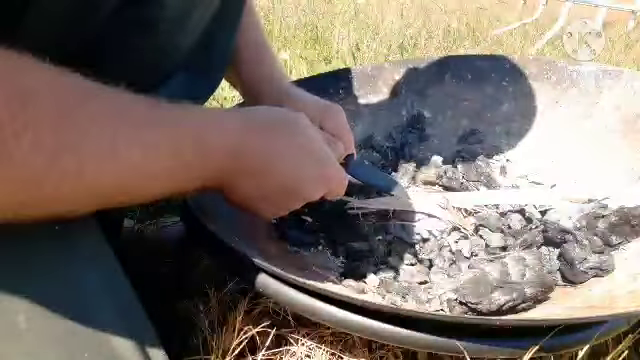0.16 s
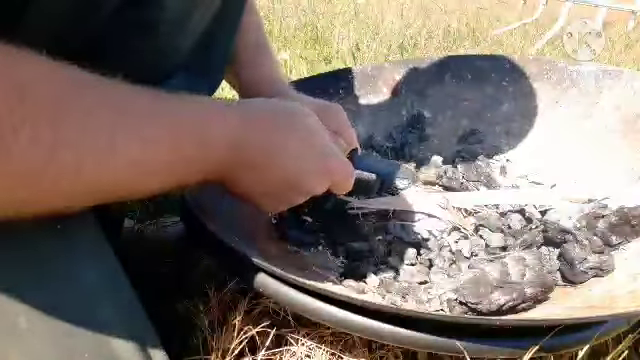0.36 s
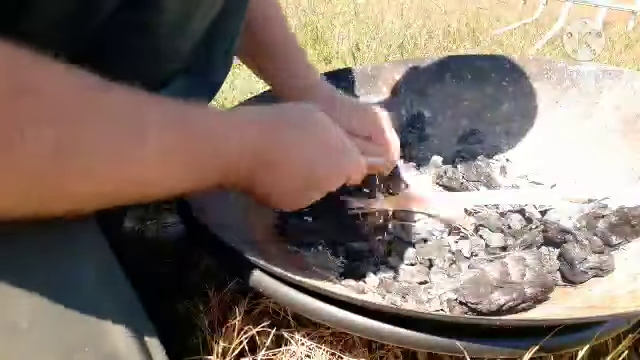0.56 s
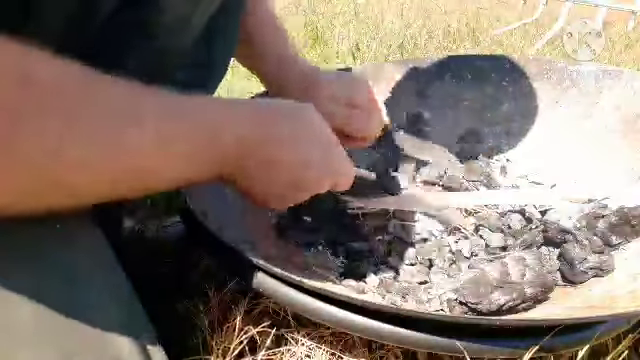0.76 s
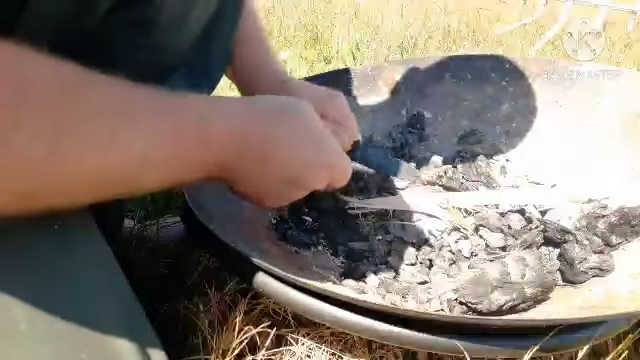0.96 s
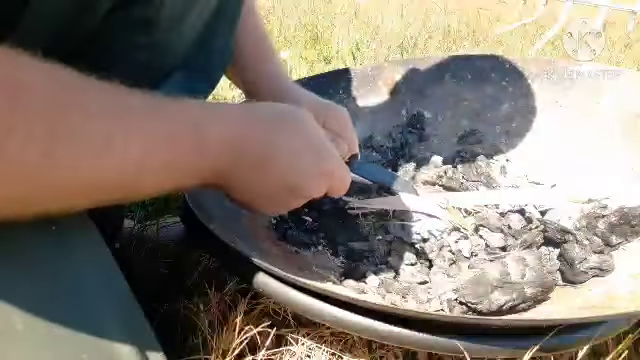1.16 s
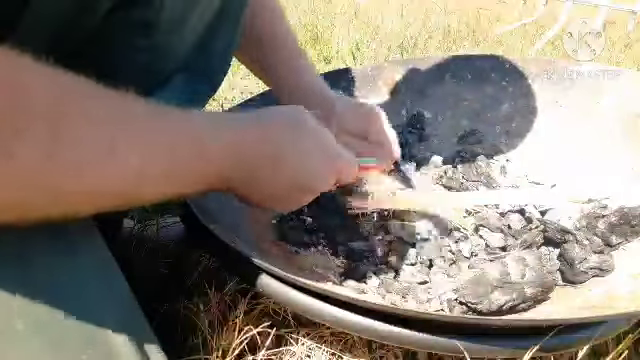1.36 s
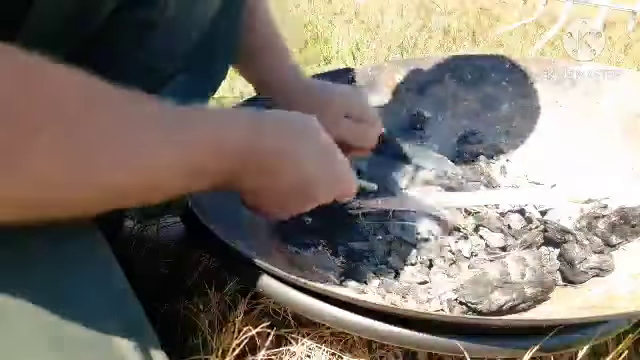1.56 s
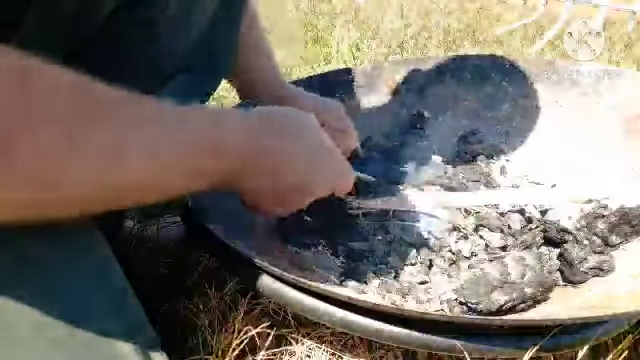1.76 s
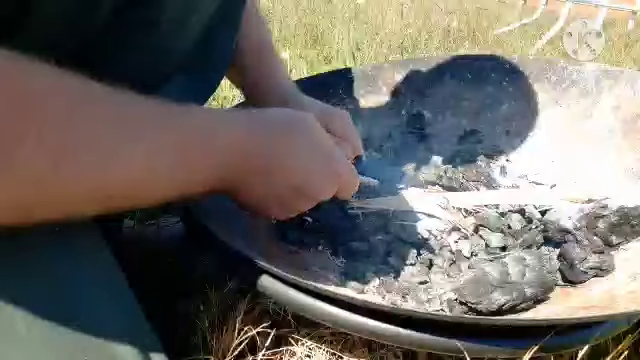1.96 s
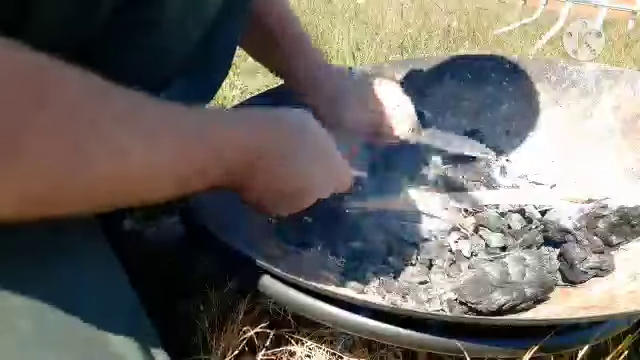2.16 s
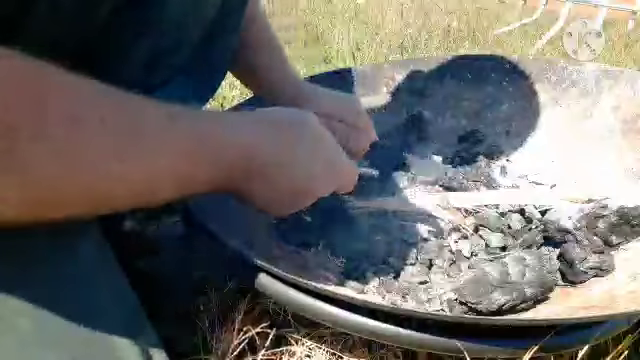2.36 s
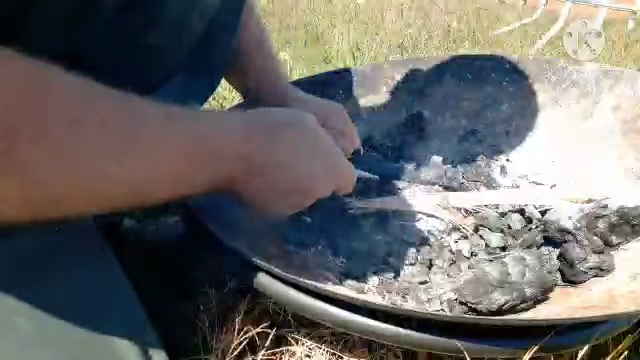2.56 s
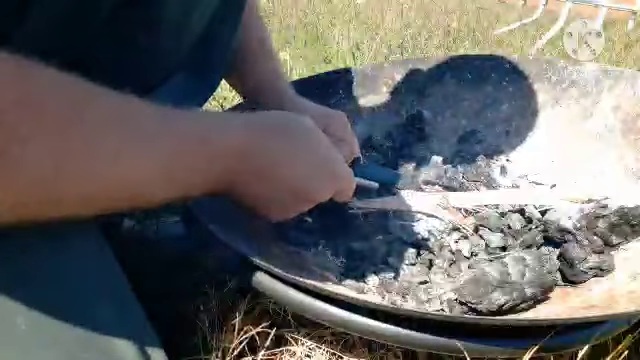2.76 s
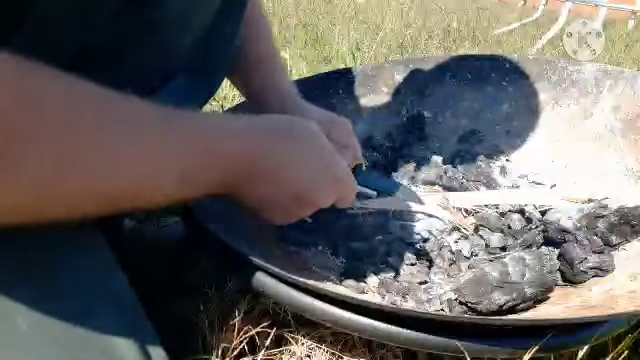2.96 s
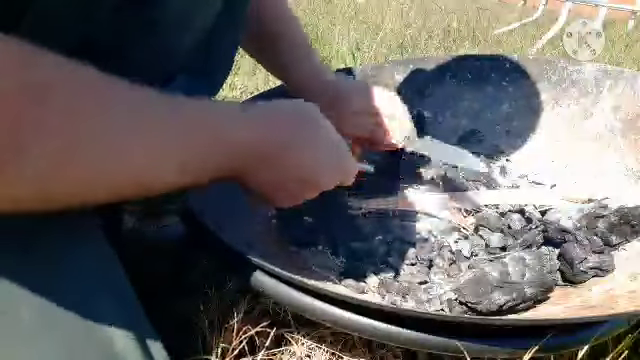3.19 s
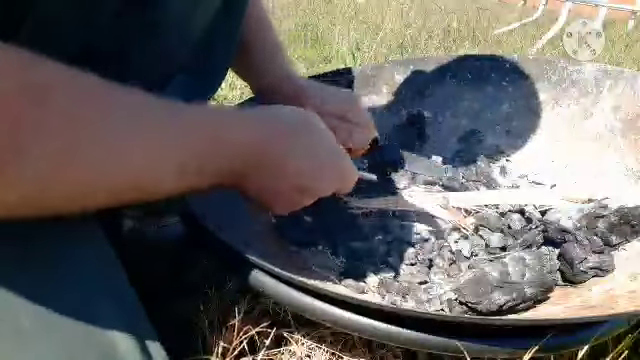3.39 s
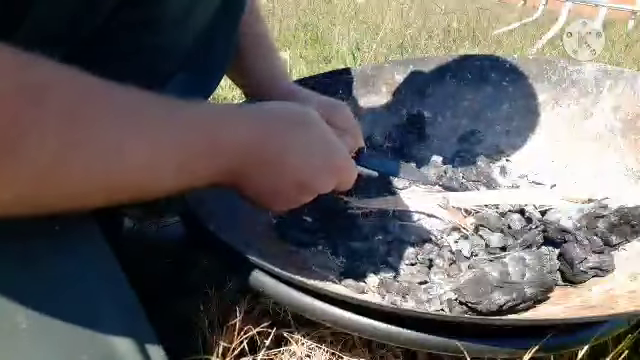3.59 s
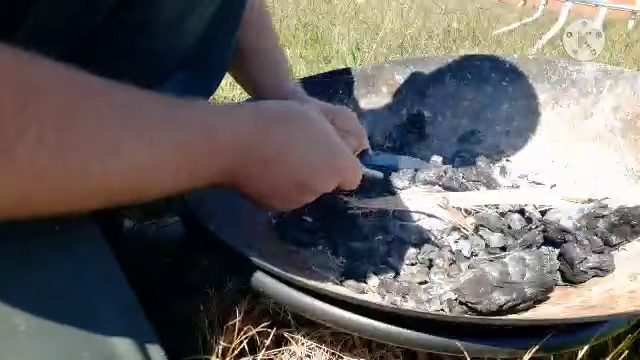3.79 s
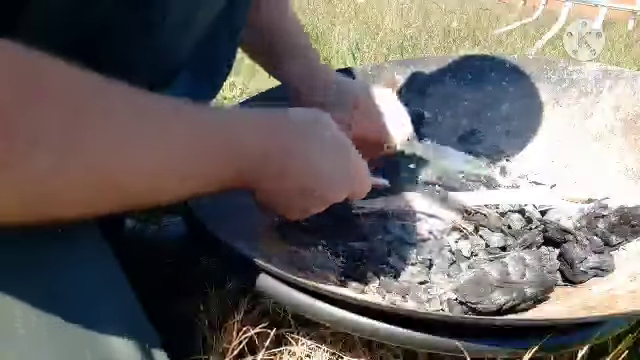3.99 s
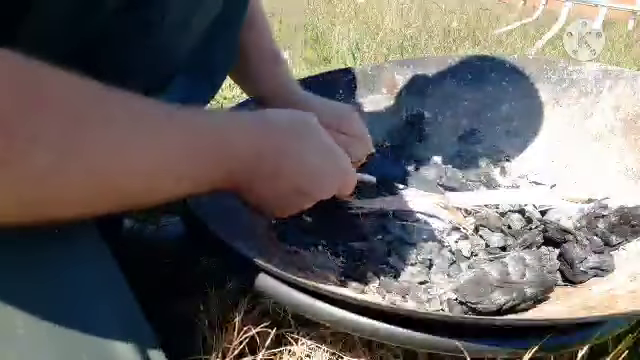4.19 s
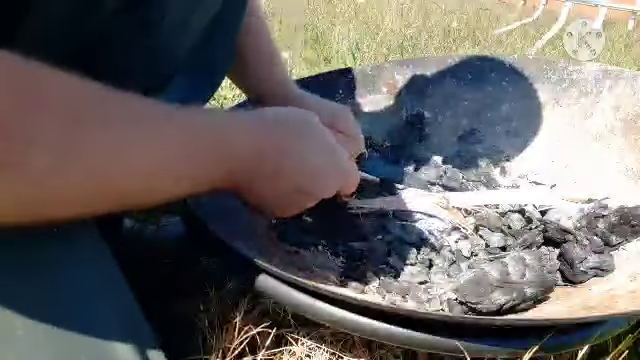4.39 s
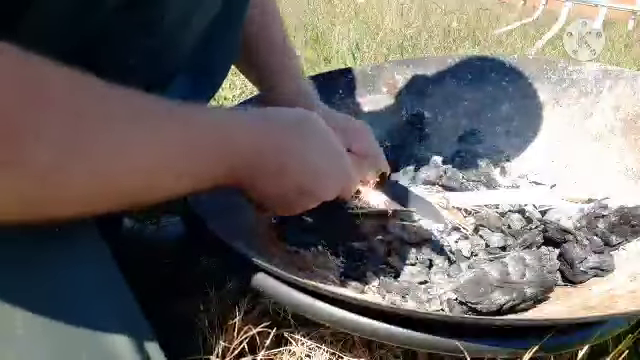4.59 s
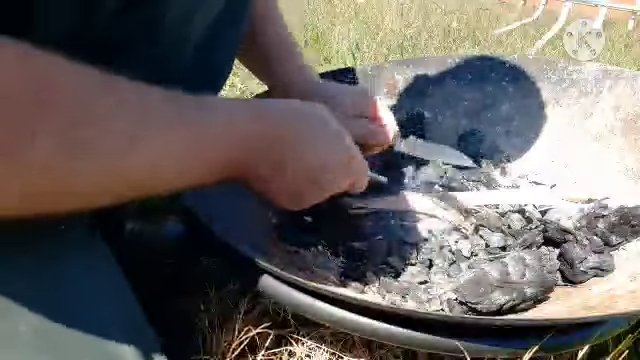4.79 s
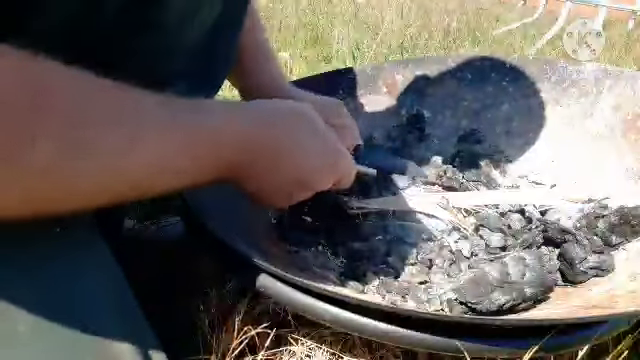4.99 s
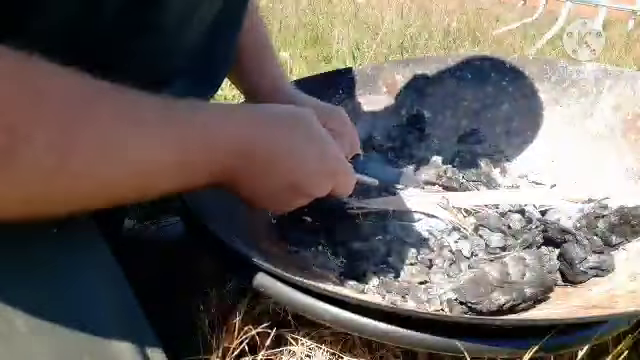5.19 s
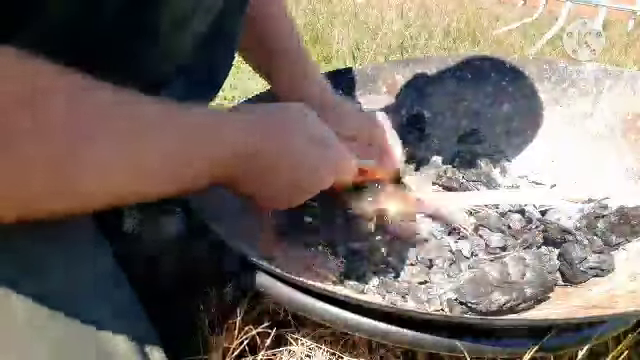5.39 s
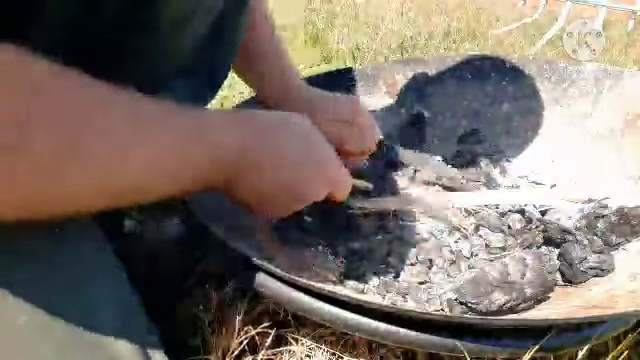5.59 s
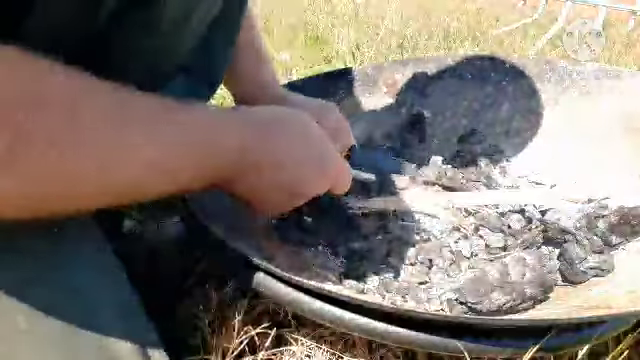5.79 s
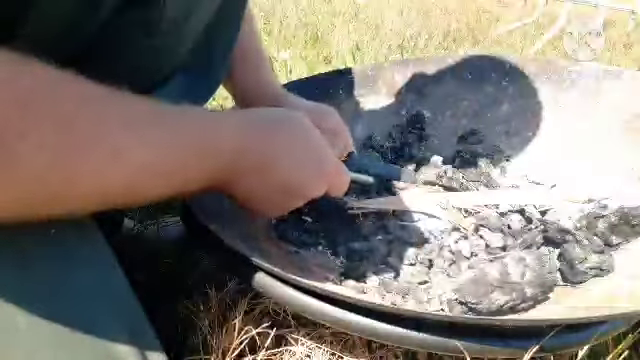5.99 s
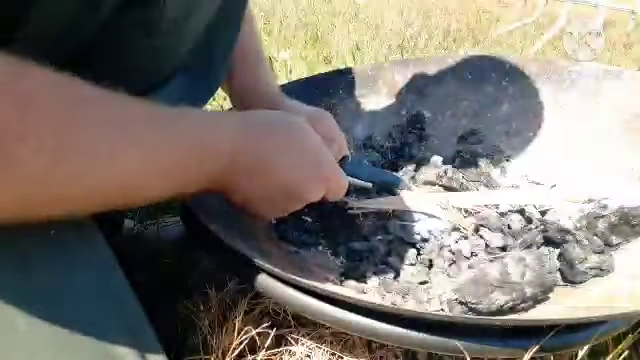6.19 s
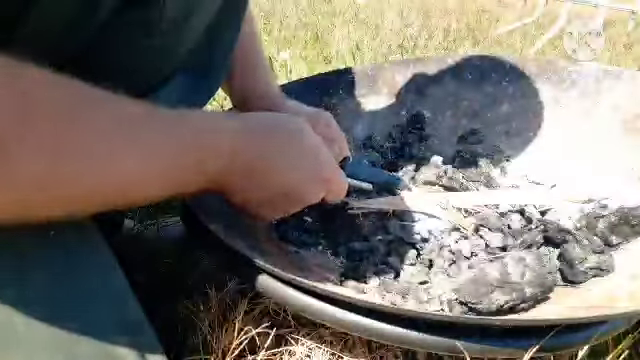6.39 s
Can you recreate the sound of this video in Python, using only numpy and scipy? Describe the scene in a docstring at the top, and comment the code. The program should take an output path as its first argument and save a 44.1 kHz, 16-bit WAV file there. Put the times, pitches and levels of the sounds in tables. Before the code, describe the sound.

A quiet open meadow, recorded close in stereo with almost no reverberation. A fine, very high insect trill runs throughout on the right, joined by quick chirps about ten a second with small gaps, a fainter lower buzz on the left and a distant chorus. Beneath are soft road rumble, slight breeze and a far engine, its low hum rising until about 2.1 s, dipping with a gear change, then climbing slowly. Over this, a knife spine is scraped hard down a spark rod at about 0.6, 1.4, 2.1, 3.15, 3.9, 4.65 and 5.4 s. Each rasp lasts under a tenth of a second: sudden gritty bite, chattering steel, sparkling hiss, dull jolt into charcoal and bowl. Stray scuffs follow some strokes, especially the first and last. Tiny dry metallic ticks reset the blade around 1.5, 1.8, 2.5, 3.1 and 3.5 s; soft rustles and faint low bumps near 5.4-5.9 s.

```python
"""Spark rod over a fire bowl in a meadow

In front of the microphones a knife spine is pushed seven times down a spark rod over a shallow steel bowl.
Each stroke bites, chatters and slides into the charcoal, as random chips that ring steel modes and hiss;
small ticks set the blade back. Pulsed tones are three insects nearby, filtered noise a far chorus,
soft rustles, road, meadow and breeze; gliding tones are a far vehicle pulling away and changing gear."""
import sys
import numpy as np
from scipy import signal
from scipy.fft import rfft, irfft, next_fast_len
from scipy.io import wavfile
from scipy.ndimage import uniform_filter1d

SR = 44100
rng = np.random.default_rng(int(sys.argv[2]) if len(sys.argv) > 2 else 0)


def bounce(signal):
    """Save signal as a 16-bit WAV file at the path given by the first command-line argument."""
    frames = np.transpose(np.atleast_2d(signal))
    limited = np.clip(frames, -1, 1)
    pcm = np.round(limited * 32767).astype(np.int16)
    wavfile.write(sys.argv[1], SR, pcm)


N = 284445  # length in samples


def amp(db):
    """Gain of a level in dB."""
    return 10 ** (np.asarray(db) / 20)


def unit(x):
    """Scaled to rms 1."""
    return x / np.sqrt(np.mean(x ** 2) + 1e-20)


def in_time(rows):
    """Each column after the time in seconds, as a curve over all samples."""
    s, *columns = np.transpose(rows)
    return [np.interp(np.arange(N) / SR, s, column) for column in columns]


def filtered(x, order, hz, kind="low"):
    """Butterworth filter with its edge or edges in Hz."""
    return signal.sosfilt(signal.butter(order, hz, kind, fs=SR, output="sos"), x)


def coloured(x, spectrum):
    """Minimum-phase filter with the shape of the given spectrum: nothing sounds early."""
    size = next_fast_len(N + 8192)
    hz, db = np.transpose(spectrum)
    grid = np.maximum(np.arange(4097) * SR / 8192, 1)
    log_gain = np.interp(np.log(grid), np.log(hz), db) * np.log(10) / 20
    # folding the cepstrum onto positive times gives the minimum phase
    cepstrum = irfft(log_gain)
    cepstrum[1:4096] *= 2
    cepstrum[4097:] = 0
    response = irfft(np.exp(rfft(cepstrum)))
    response = unit(response) / np.sqrt(8192)
    return irfft(rfft(x, size) * rfft(response, size), size)[..., :N]


def resonances(x, modes):
    """Parallel resonances, signs alternating; white noise of rms 1 comes out near rms 1."""
    out, power = 0, 0
    for k, (hz, width_hz, db) in enumerate(modes):
        r = np.exp(-np.pi * width_hz / SR)
        b = (1 - r * r) / 2 * np.array([1, 0, -1]) * amp(db) * (-1) ** k
        a = [1, -2 * r * np.cos(2 * np.pi * hz / SR), r * r]
        out = out + signal.lfilter(b, a, x)
        power += amp(db) ** 2 * np.pi * width_hz / SR
    return out / np.sqrt(power)


def drift(rate_hz):
    """Random wander of spread 1: noise smoothed twice above the given rate."""
    r = np.exp(-2 * np.pi * rate_hz / SR)
    noise = rng.standard_normal(N + SR)
    return unit(signal.lfilter([1], [1, -2 * r, r * r], noise)[SR:])


def panned(pan_db):
    """Gains of the left and right microphone for a left-right level difference in dB."""
    return amp([[pan_db / 2], [-pan_db / 2]])


def placed(x, pan_db, lag):
    """Two microphones: left-right level in dB and samples by which the left one lags."""
    late = np.interp(np.arange(N) - abs(lag), np.arange(N), x)
    return np.array([late, x] if lag > 0 else [x, late]) * panned(pan_db)


# Breeze gusts at the microphones. Each row: middle in seconds, length in seconds, level in dB.
GUSTS = [(0, 1, -66), (1.17, 0.96, -59), (5.42, 0.35, -58), (6.002, 0.97, -56.5)]
CALM_DB = -70


def breeze():
    """Level of the breeze in dB: calm, with gusts that swell and sink."""
    t = np.arange(N) / SR
    swells = [amp(db) * np.cos(np.pi * np.clip((t - s) / length, -.5, .5)) for s, length, db in GUSTS]
    return 20 * np.log10(amp(CALM_DB) + sum(swells))


# Levels of the surroundings. Each row: time in seconds, road in dB, meadow in dB.
AIR_LEVEL = [(0, -55.5, -75.5), (.5, -51.5, -75.5), (1, -55, -76.5), (2.5, -54.5, -76), (3.5, -57.5, -74),
             (4.5, -54, -76), (5.5, -54, -79), (6.45, -56, -80)]
# Colour of the far road. Each row: frequency in Hz, relative density in dB per Hz.
ROAD = [(20, -32), (40, -37), (60, -1), (85, -3.5), (110, -3.5), (140, -6), (190, -10), (260, -20),
        (350, -24.5), (500, -33.5), (900, -64)]
# Colour of grass and leaves. Each row: frequency in Hz, relative density in dB per Hz.
MEADOW = [(200, -13), (500, -3.5), (900, -4), (1400, 5), (2000, -3), (3000, -14.5), (4000, -13),
          (5000, -0.5), (6000, -22.5), (7500, -22.5)]


def air():
    """Noise: road partly shared by both microphones, patchy meadow, low breeze mostly apart."""
    road_db, meadow_db = in_time(AIR_LEVEL)
    noise = rng.standard_normal((7, N))
    road = coloured(0.44 * noise[0] + 0.51 * noise[1:3], ROAD)
    low = filtered(noise[3:5], 2, 2200)
    high = noise[3:5] - low
    meadow = coloured(low * amp(0.57 * drift(3.3)) + high * amp(1.5 * drift(18)), MEADOW)
    # the reversed noise is a small part common to both microphones
    rumble = unit(filtered(0.38 * noise[0][::-1] + noise[5:], 2, [38, 70], "band"))
    return amp(road_db) * road + amp(meadow_db) * meadow + amp(breeze() + 1.9 * drift(5.8)) * rumble


# Far engine. Each row: time in seconds, firing rate in Hz, first order in dB, second order in dB,
# both before a small random waver.
ENGINE = [(0, 70.8, -60, -70), (.16, 77.14, -45.5, -46.5), (.3, 82, -46, -48), (.59, 84.36, -62.5, -46),
          (.7, 85.3, -55.5, -49.5), (.76, 89.1, -49.5, -74), (.9, 90.74, -50.5, -53),
          (1.15, 92.8, -42.5, -56.5), (1.28, 97.7, -43, -62.5), (1.49, 103.6, -58.5, -59),
          (1.8, 105.8, -49, -63.5), (2.06, 109.6, -52.5, -62.5), (2.15, 102, -54, -56.5),
          (2.27, 93.5, -45.5, -52), (2.36, 84.1, -52.5, -51), (2.58, 87.6, -60, -55.5),
          (2.75, 90.5, -52.5, -63.5), (2.96, 91.1, -47.5, -64.5), (3.16, 92.6, -45, -57.5),
          (3.56, 93.2, -51.5, -69.5), (3.66, 93.5, -49, -86), (3.76, 95.25, -48.5, -62),
          (4.0, 96.8, -42.5, -53.5), (4.45, 99.2, -43.5, -81.5), (4.55, 99.9, -41.5, -60),
          (4.83, 102.1, -47.5, -65.5), (5.08, 103.1, -48, -61.5), (6.45, 112, -50, -66)]
# Its third order. Each row: time in seconds, level in dB before the waver.
THIRD_ORDER = [(0, -79), (.16, -70), (.45, -68.5), (.7, -85.5), (2.2, -86.5), (2.4, -72), (2.7, -94),
               (4.6, -78.5), (4.85, -77.5), (5.1, -72.5), (6.45, -96)]
# Faint rising hum above it. Each row: time in seconds, frequency in Hz, peak level in dB.
WHINE = [(0, 335, -88), (.15, 342, -72), (.55, 358, -73.5), (1.2, 378, -83), (1.4, 385, -100)]


def engine():
    """The firing rate and its first orders, each wavering on its way over the field, and a faint hum."""
    hz, *orders_db = in_time(ENGINE) + in_time(THIRD_ORDER)
    turn = 2 * np.pi * np.cumsum(hz) / SR
    tones = []
    for order, db in enumerate(orders_db, start=1):
        level = np.sqrt(2) * amp(db + drift(6.13))
        tones.append(level * np.sin(order * turn + 0.25 * drift(9.8)))
    whine_hz, whine_db = in_time(WHINE)
    whine_turn = 2 * np.pi * np.cumsum(whine_hz) / SR
    tones.append(amp(whine_db) * np.sin(whine_turn + .3 * drift(8.6)))
    return placed(tones[0], -2.5, 0) + placed(sum(tones[1:]), 1.3, 0)


def wing_pulses(strokes, duty, hz, sweep_hz, jitter, skipped, uneven_db):
    """One tone pulse a wing stroke: pitch bends through the pulse, some strokes stay silent."""
    which = np.floor(strokes + .5).astype(int) + 1
    luck = rng.random((which.max() + 1, 3))[which]  # chance of place, silence and level, per stroke
    place = (strokes + .5) % 1 - .5 + jitter * (luck[:, 0] - .5)
    shape = np.sqrt(np.clip(1 - (2 * place / duty) ** 2, 0, 1))
    shape *= amp(-6.0 * place / duty)   # struck hard at the start of the stroke, then fading
    pitch_hz = hz + sweep_hz * place / duty + 60.0 * drift(354)
    gain = (luck[:, 1] > skipped) * amp(uneven_db * (luck[:, 2] - .5))
    envelope = uniform_filter1d(shape * gain, size=24)
    return unit(envelope * np.sin(2 * np.pi * np.cumsum(pitch_hz) / SR))


# Low buzzer to the left. Each row: time in seconds, wing strokes done.
BUZZ = [(0, -.4), (1.5, 96.47), (2, 129.05), (3, 193.43), (3.5, 225.43), (5, 320.63), (6, 384.58),
        (6.45, 413.3)]
# Chirper, about ten times a second. Each entry: middle of a chirp in seconds.
CHIRPS = [.045, .15, .242, .323, .417, .514, .69, .77, 0.859, .94, 1.04, 1.162, 1.263, 1.465, 1.571, 1.674,
          1.77, 1.861, 1.945, 2.036, 2.211, 2.302, 2.391, 2.474, 2.563, 2.685, 2.809, 2.94, 3.061, 3.293,
          3.464, 3.605, 3.726, 3.841, 4.157, 4.217, 4.315, 4.4, 4.513, 4.808, 4.914, 5.013, 5.114, 5.207,
          5.315, 5.6, 5.712, 5.791, 5.904, 5.989, 6.088, 6.192, 6.295, 6.375]
# Swell of the chirper. Each row: time in seconds, level in dB before the chance and final trim.
CHIRP_LEVEL = [(0, -59), (.45, -51.5), (1.1, -58), (1.9, -55.5), (2.7, -58), (3.5, -53), (4.9, -57),
               (6.45, -54.5)]
CHIRP_S, CHIRP_SPREAD_DB = 0.026, 1.5  # length of a chirp, chance in its level
# Colour of the far insects. Each row: frequency in Hz, relative density in dB per Hz.
CHORUS = [(5600, -36.5), (6400, -26), (7400, -13.5), (8000, -26.5), (8700, -36.5), (9200, -21), (9900, -10),
          (10500, -13.5), (11400, -21.5), (13500, -23.5), (15400, -16), (15550, -34.5), (15900, -41.5)]
TRILL_PER_S, TRILL_START = 71.84, -.28  # wing strokes a second, strokes done at the start


def insects():
    """Nearby wing pulses: triller and chirper to the right, halting buzzer to the left; a far chorus."""
    t = np.arange(N) / SR
    strokes = TRILL_START + TRILL_PER_S * t
    trill = wing_pulses(strokes, duty=.48, hz=10920, sweep_hz=150,
                        jitter=.04, skipped=.006, uneven_db=2.5)
    partner = wing_pulses(strokes - .45, duty=0.67, hz=10040, sweep_hz=-100,
                          jitter=.05, skipped=0.067, uneven_db=6.0)
    trill = trill + amp(-17) * partner   # a lower, fainter partner pulse follows each pulse of the trill
    buzz = wing_pulses(in_time(BUZZ)[0], duty=.68, hz=7440, sweep_hz=-250,
                       jitter=.2, skipped=.07, uneven_db=4.0)
    gate = np.zeros(N)
    for s, luck_db in zip(CHIRPS, rng.normal(0, CHIRP_SPREAD_DB, len(CHIRPS))):
        gate[round((s - CHIRP_S / 2) * SR):round((s + CHIRP_S / 2) * SR)] = amp(luck_db)
    gate = gate * amp(in_time(CHIRP_LEVEL)[0])
    chirp = gate * wing_pulses(128 * t, duty=0.73, hz=9900, sweep_hz=-100,
                               jitter=0.095, skipped=.02, uneven_db=4.0)
    flutter = amp(3.1 * np.array([drift(110), drift(130)]))
    chorus = coloured(rng.standard_normal((2, N)) * flutter, CHORUS)
    return (amp(-53 + 0.43 * drift(7.7)) * placed(trill, -12, 1.1)
            + amp(-64) * placed(buzz, 9.7, -1.5)
            + amp(-2.5) * placed(chirp, -10.5, .9)
            + amp(-57) * chorus * panned(-1))


# Dull bumps carried through the ground. Each row: start in seconds, level in dB before decay and lowpass.
BUMPS = [(5.381, -38), (5.45, -40), (5.761, -39), (5.855, -45)]
BUMP_HZ, BUMP_WIDTH_HZ = 70, 26


def bumps():
    """Each bump is one soft low swing, a decaying sine."""
    t, out = np.arange(round(.08 * SR)) / SR, np.zeros(N)
    swing = np.exp(-np.pi * BUMP_WIDTH_HZ * t) * np.sin(2 * np.pi * BUMP_HZ * t)
    for s, db in BUMPS:
        out[round(s * SR):][:len(t)] += amp(db) * swing
    return filtered(out, 2, 150)


# Soft rustles between the strokes, and the fading tails of strokes. Each row: middle in seconds,
# length in seconds, frequency in Hz, width in Hz, level in dB before a random waver.
RUSTLES = [(0.145, 0.29, 1270, 250, -74.5), (0.146, 0.28, 4970, 1186, -72), (0.794, 0.15, 1920, 398, -68.5),
           (0.826, 0.17, 4500, 500, -74), (1.136, 0.042, 600, 484, -73), (1.57, 0.04, 2140, 179.3, -62),
           (1.571, 0.041, 3260, 600, -63), (4.773, 0.072, 2468, 2500, -87), (2.224, 0.052, 2500, 2540, -72),
           (1.603, 0.16, 1591, 300, -70.5), (1.865, 0.1, 1507, 300, -69.5),
           (2.34, 0.062, 2130, 1210, -69.5), (4.149, 0.052, 2206, 1160, -69),
           (5.066, 0.078, 2480, 1189, -65.5), (6.081, 0.11, 2029, 1009, -73),
           (6.084, 0.12, 4930, 895, -75.5)]


def rustles():
    """Brief swells of noise, each in one band, between the strokes and as the fading tails of strokes."""
    out = np.zeros((2, N))
    for s, length, hz, width_hz, db in RUSTLES:
        at, size = round((s - length / 2) * SR), round(length * SR)
        swell = np.sqrt(np.hanning(size)) * amp(db + 3.6 * drift(60)[:size])
        band = resonances(rng.standard_normal((2, size)), [(hz, width_hz, 0)])
        out[:, max(at, 0):at + size] += (swell * band)[:, max(-at, 0):]
    return out


# Modes of blade and rod. Each row: frequency in Hz, width in Hz before it is broadened by a factor,
# relative level in dB.
STEEL = [(1240, 220, -5), (1480, 130, -6), (2010, 110, -5), (2430, 130, -9), (2880, 380, -1),
         (3850, 250, -6), (4700, 500, -4), (5400, 400, 0), (7050, 550, -2), (9400, 350, -4),
         (11250, 600, 0), (12700, 400, -7), (14250, 500, -7)]


def steel_ring(chips, modes, wander_db):
    """Each mode resonates steeply; its share wanders as the edge travels along the rod."""
    out, power = 0, 0
    for hz, width_hz, db in modes:
        mode = [(hz, 1.5 * width_hz, 0)]
        once = resonances(chips * amp(wander_db * drift(20)), mode)
        twice = resonances(once, mode) * np.pi * width_hz / SR
        out = out + amp(db) * twice * np.sqrt(3)
        power += amp(db) ** 2 * np.pi * width_hz / SR
    return out / np.sqrt(power)


# Blade set back on the rod. Each row: time in seconds, strength in dB before the ring,
# modes under 2700 Hz in dB re the middle, modes over 8000 Hz in dB re the middle,
# left-right in dB (limited to 8 either way).
TICKS = [(1.487, -43.5, -9, -6, 3), (1.781, -40.5, -12, -14, -11.5), (2.4905, -45.5, -4, -6, -14),
         (3.0795, -43.5, 3.5, -7, -10), (3.2679, -53, -1, -1, -1.0), (3.5248, -40.5, -5, -6, -9),
         (4.027, -57, 6, -5, -5),]


def ticks():
    """Single dry contacts: every steel mode is struck once, each with a strength of its own."""
    out, luck_db = np.zeros((2, N)), rng.normal(0, 2, (len(TICKS), len(STEEL)))
    s, peak_db, low_db, high_db, pan_db = np.transpose(TICKS)
    sides_db = np.clip(pan_db, -8, 8) * [[.5], [-.5]]
    for k, (hz, width_hz, db) in enumerate(STEEL):
        clicks = np.full((2, N), 1e-18)
        strength_db = peak_db + db + luck_db[:, k] + low_db * (hz < 2700) + high_db * (hz > 8000)
        clicks[:, (s * SR).astype(int)] = amp(strength_db + 11.5 + sides_db)
        out += steel_ring(clicks, [(hz, 2.0 * width_hz, 0)], wander_db=-4)   # the pressed blade is damped
    return out


# Strokes of the knife. Each row: time the edge digs in in seconds, lows in dB, push before it in seconds,
# bite length in seconds, grit of the bite in dB, slide length in seconds, grit of the slide in dB,
# sag over the slide in dB, then thud, hiss and ring in dB added to the stage colours.
STROKES = [(.587, -3.5, 0.031, 0.017, -36, .027, -40, 0, -3.5, 0.5, 7),
           (1.386, -2.5, 0.038, 0.011, -34, .04, -31.5, 7.5, -3.5, -2, 2),
           (2.098, -4.5, 0.026, .021, -32.5, .037, -37.5, 5, 2.5, -1, 6),
           (3.153, 0.5, 0.039, 0.019, -36.5, 0.04, -39, -0.5, -3, -2, 8.5),
           (3.923, 0.5, 0.035, 0.026, -33.5, 0.035, -37.5, 12, 2, 0.5, -0.5),
           (4.653, 2, 0.035, 0.018, -36, 0.03, -36, -2.5, -1, 0.5, 5.5),
           (5.413, -0.5, 0.036, 0.02, -34, 0.02, -33.5, -2.5, -2.5, 0, 3.5)]
# Colour as push begins, push ends, bite begins, bite ends, slide begins, slide ends, blade is lifted.
# Each row: thud, hiss and ring in dB re grit, before the colour of the stroke.
STAGES = [(-8, 17, 3), (-27.5, 11, 4.5), (-21.5, -8.5, 4), (-10, -5.5, 8.5), (-2.5, 0.5, -4),
          (2.5, -2.5, -6), (-2, 2, -38)]
PUSH_SWELL_DB, DIG_S, DIG_DB = 25, .002, 13.5   # the push swells, then the level jumps as the edge digs in
EASE_S, LIFT_OFF_S, LIFT_OFF_DB = 0.0052, 0.037, 30   # the bite eases into the slide; the blade lifts off
# Blade tip dragging through the charcoal. Each row: start in seconds, length in seconds, grit in dB,
# fall in dB.
DRAGS = [(0.659, 0.041, -51, 0.5), (1.596, .035, -74, 2), (2.447, 0.055, -65, 3), (3.526, 0.033, -72, -1),
         (5.045, .04, -77, 4), (5.485, 0.034, -48, 2.5), (5.53, 0.075, -62.5, -5.5)]
DRAG_THUD_DB, DRAG_HISS_DB, DRAG_RING_DB = 2.5, 1, -37   # re grit
DRAG_FADE_S, DRAG_TAIL_S, DRAG_TAIL_DB = 0.0086, .04, 25
# Edge catching on the rod, scuffs in the charcoal. Each row: time in seconds, nominal peak in dB,
# brightness in dB, left-right in dB (limited to 8 either way).
CATCHES = [(.5885, -13, 11, -12), (.5948, -3, -7, 11.5), (.598, -13, -12, 1), (0.6021, -8.5, -14, -5),
           (.6173, -16, 7, -1), (.664, -22, 4, 1), (.6744, -42, -2, -2), (.6858, -21.5, 1, -9),
           (0.6877, -24, 3, 3), (.7024, -42, -2, 6), (1.3853, -15, -9, -2.5), (1.3983, -5.5, -22, 4.5),
           (1.4424, -29, -6, -2), (1.5975, -32.5, 4, -2), (1.604, -38, 14, -3), (1.6126, -34, -4, -5),
           (1.7742, -37.5, 9.5, 2.5), (2.0815, -43.5, 0, 1), (2.0975, -10, 5, 1), (2.1052, -4, 6, -3),
           (2.1075, 2.5, 2, -4), (2.108, -2.5, 3, -3.5), (2.1128, -18.5, 6, 0.5), (2.1158, -13.5, 8.5, 1.5),
           (2.1736, -37, 2, 10), (2.4485, -36, 4, 0), (2.4577, -33.5, 17, -5), (2.462, -35, 1, 0),
           (3.0759, -34.5, 10, 15.5), (3.1612, -3, -6, 3), (3.165, -4, -5, 1), (3.1695, -16, 0, -5),
           (3.1912, -8, -13, -2.5), (3.2157, -26, 13, 6), (3.8834, -37, -10, 1), (3.924, -19, -11, 1),
           (3.9784, -16, 5, 1.5), (4.6368, -44, 0, -4.5), (4.6612, 0.5, -5.5, -3), (4.664, -12, 0, -2.5),
           (5.0464, -53.5, 4, -12), (5.056, -36.5, -13, -7), (5.0807, -50, 3, -5), (5.3956, -38, 6, 3),
           (5.4138, -7, 0, -1), (5.4232, -5, 6, -3), (5.4534, -25, 3, 2.5), (5.4754, -20, 0, 8),
           (5.4844, -16.5, 8.5, -4), (5.5132, -13.5, 1, 3), (5.5303, -42, -5, -10), (5.5614, -24, 7, -4),
           (5.5867, -30, 8, 12), (5.6037, -47, -6, .5)]
CATCH_RISE_S, CATCH_T60_S = .0006, .016
CATCH_THUD_DB, CATCH_HISS_DB, CATCH_RING_DB = -15, -5, -1   # re grit, before brightness
RING_BRIGHT_SHARE = .4   # how far the ring follows the brightness of a catch


def contact():
    """Envelopes of grit, thud, hiss and ring from strokes, drags and catches, and the side they come from."""
    level, pan_db = np.zeros((4, N)), np.full(N, -1.5)  # level holds power until the end
    shapes = []
    for s, _, push, bite, bite_db, slide, slide_db, sag_db, *colour_db in STROKES:
        end = bite + slide
        times = s + np.array([-push, -DIG_S, 0, bite, bite + EASE_S, end, end + LIFT_OFF_S])
        push_db, end_db = bite_db - DIG_DB, slide_db - sag_db
        grit_db = [push_db - PUSH_SWELL_DB, push_db, bite_db, bite_db,
                   slide_db, end_db, end_db - LIFT_OFF_DB]
        shapes.append(np.column_stack([times, grit_db, np.add(STAGES, colour_db)]))
    for s, length, db, fall_db in DRAGS:
        times = [s - DRAG_FADE_S, s, s + length, s + length + DRAG_TAIL_S]
        grit_db = [db - 23, db, db - fall_db, db - fall_db - DRAG_TAIL_DB]
        shapes.append([(t, g, DRAG_THUD_DB, DRAG_HISS_DB, DRAG_RING_DB) for t, g in zip(times, grit_db)])
    for shape in shapes:
        grit_db, *others_db = in_time(shape)
        on = slice(round(shape[0][0] * SR), round(shape[-1][0] * SR))
        level[:, on] += amp([grit_db[on]] + [grit_db[on] + db[on] for db in others_db]) ** 2
    t = np.arange(round(.08 * SR)) / SR
    for s, peak_db, bright_db, side_db in CATCHES:
        at = round(s * SR)
        # a burst of chips peaks well above its mean level
        rise = 1 - np.exp(-(t / CATCH_RISE_S) ** 2)
        shape = rise * amp(peak_db - 15 - 60 * t / CATCH_T60_S)
        ring_db = CATCH_RING_DB + RING_BRIGHT_SHARE * bright_db
        colour = amp([[0], [CATCH_THUD_DB], [CATCH_HISS_DB + bright_db], [ring_db]])
        level[:, at:at + len(t)] += (shape * colour) ** 2
        pan_db[at:at + round(CATCH_T60_S / 3 * SR)] = np.clip(side_db, -8, 8)
    return np.sqrt(level), uniform_filter1d(pan_db, size=64)


# Colour of the direct grit. Each row: frequency in Hz, relative density in dB per Hz.
GRIT = [(290, -41.5), (500, -20), (775, 4), (1300, 0.5), (1470, 3.5), (2340, 0.5), (5550, 3.5),
        (8720, -17.5), (12000, -3.5), (15600, -29.5), (22000, -120)]
# Modes of hand and bowl. Each row: frequency in Hz, width in Hz, relative level in dB.
THUD = [(269.2, 67, -0.5), (432, 100, -0.5), (650, 230, -2), (886, 450, -5), (145.4, 114, 2.5)]
LOWS_HZ = 2300   # grip and blade angle set each stroke's level below this


def knife():
    """Dense uneven chip clicks sound directly, ring the steel, jolt hand and bowl and hiss as sparks."""
    (grit, thud, hiss, ring), pan_db = contact()
    sizes_db = 4.2 * np.minimum(rng.exponential(1, (4, N)), 4)
    torn = rng.random((4, N)) < 14000 / SR  # chips a second
    chips = torn * amp(sizes_db) * rng.choice([-1, 1], (4, N))
    chips = chips / chips.std() * amp(0.47 * drift(300)) + 1e-18   # the edge chatters
    # the bowl scatters the treble, so part of it differs between the microphones
    at_mics = chips[0] + filtered(chips[2:], 2, 1700, "high")
    direct = amp(-1) * coloured(grit * at_mics, GRIT)
    rung = amp(-6) * steel_ring(ring * at_mics, STEEL, wander_db=1.5)
    jolt = resonances(thud * chips[1], THUD)
    sparks = amp(5.5) * filtered(hiss * chips[2:], 2, 9000, "high")
    # light fast contact sings in the high modes alone
    singing = amp(-6) * steel_ring(hiss * at_mics, STEEL[9:], wander_db=1.5)
    lows_db, = in_time([stroke[:2] for stroke in STROKES])
    lows = (amp(lows_db) - 1) * filtered(direct + rung, 2, LOWS_HZ)
    return (direct + rung + lows + jolt + sparks + singing) * amp([pan_db / 2, -pan_db / 2])


def afterglow(x, level_db, t60):
    """Bowl, ground and grass return each contact as a faint dull tail of decaying noise."""
    t = np.arange(round(.4 * SR)) / SR
    decay = amp(level_db - 60 * t / t60) * (t > .006)
    tail = rng.standard_normal((2, len(t))) * decay / np.sqrt(len(t))
    tail = filtered(tail, 1, [700, 6000], "band")
    return signal.fftconvolve(x, tail, axes=1)[:, :N]


def scene():
    """Engine and air far off, insects around, knife in front."""
    steel = ticks() + knife()
    near = bumps() + rustles() + steel + afterglow(steel, level_db=-12, t60=0.41)
    return air() + engine() + insects() + near


CUTOFF_HZ = 15950


def record(dry):
    """The highest peaks are rounded, the top is cut steeply."""
    ceiling = .75
    rounded = ceiling * np.tanh(dry / ceiling)
    return signal.sosfilt(signal.cheby2(20, 80, CUTOFF_HZ, fs=SR, output="sos"), rounded)


dry = scene()
out = record(dry)
bounce(out)
```